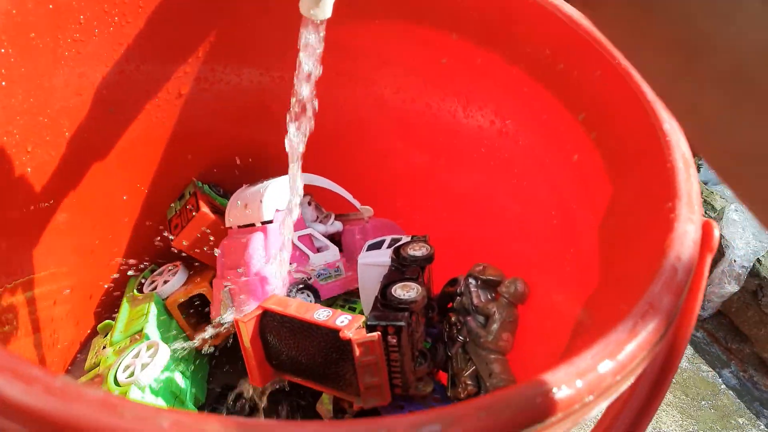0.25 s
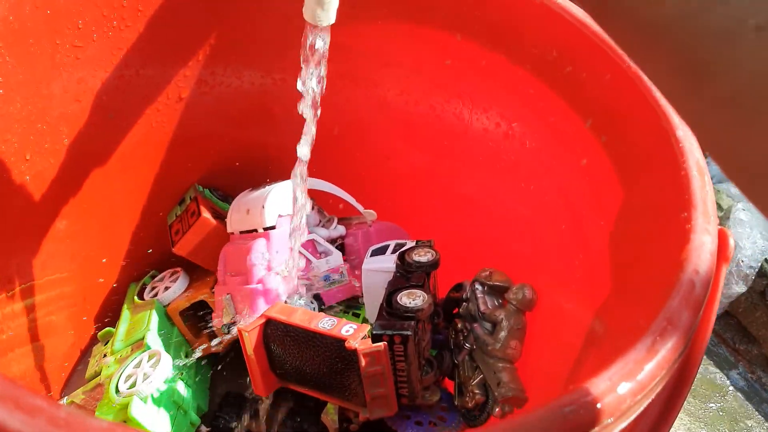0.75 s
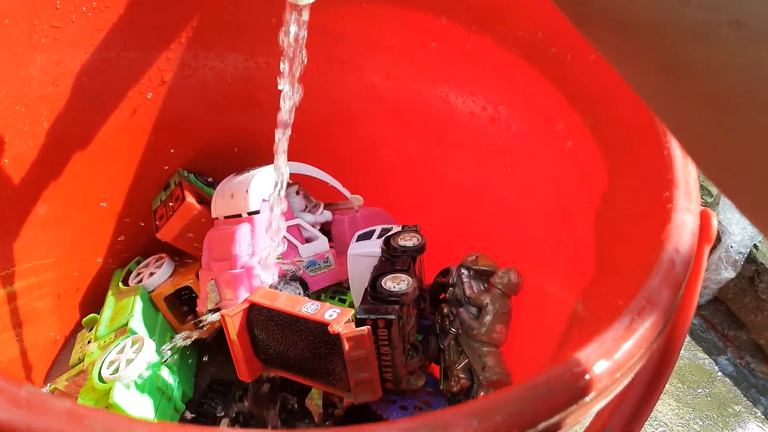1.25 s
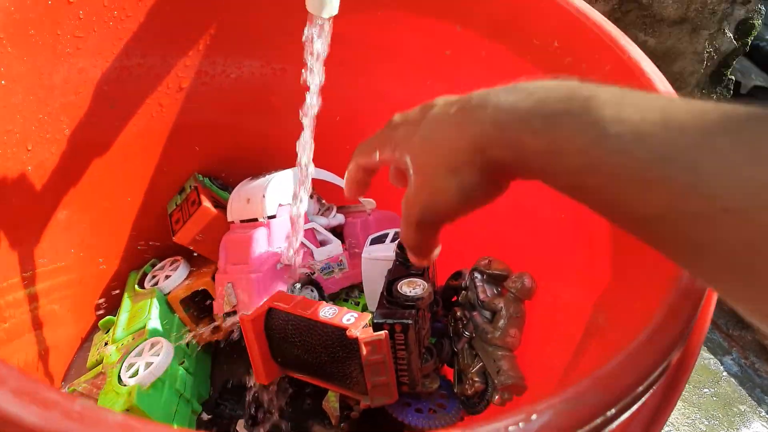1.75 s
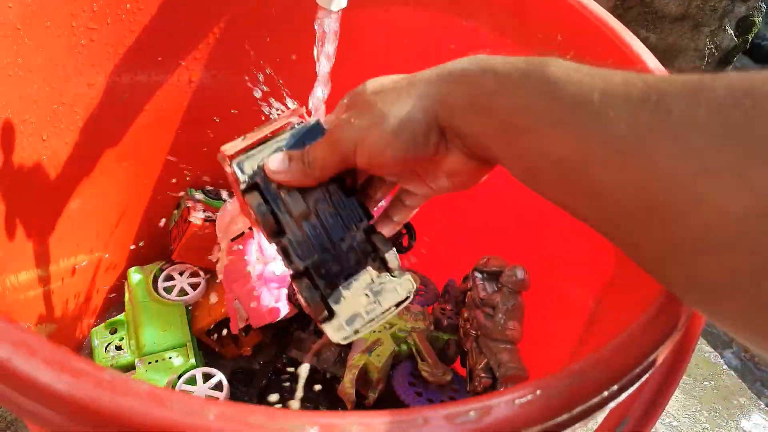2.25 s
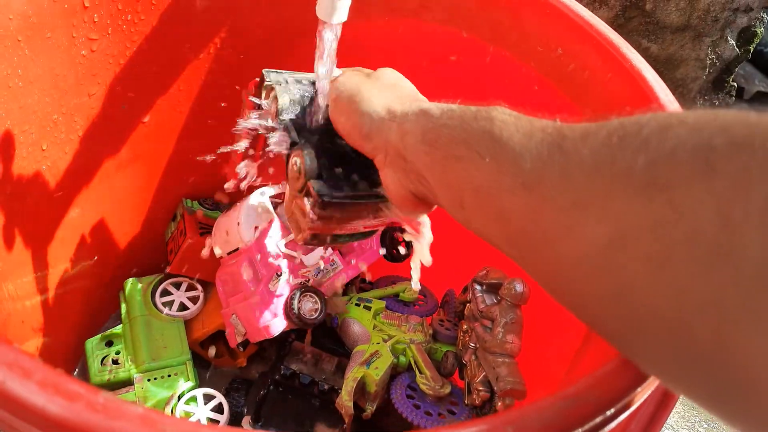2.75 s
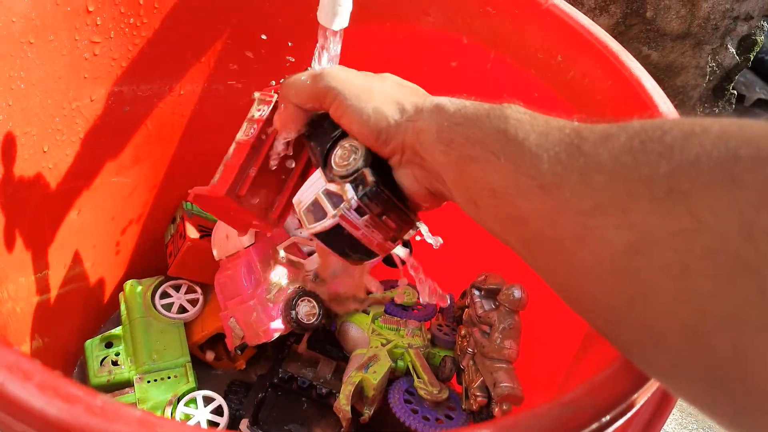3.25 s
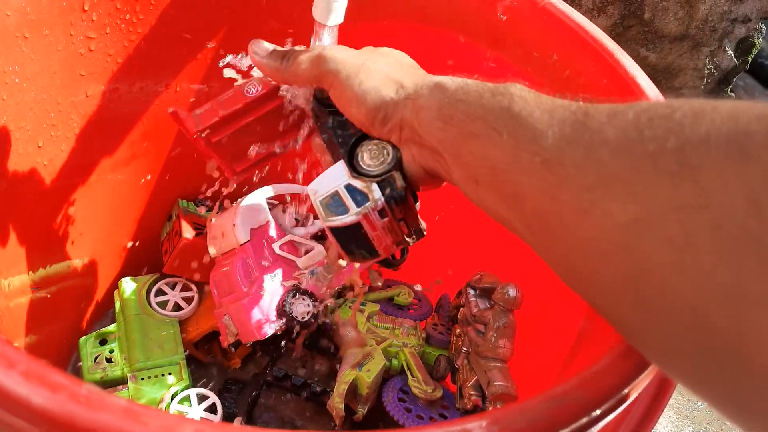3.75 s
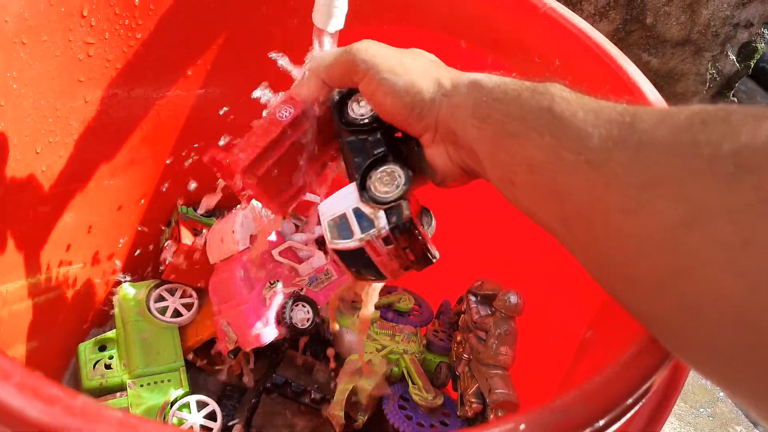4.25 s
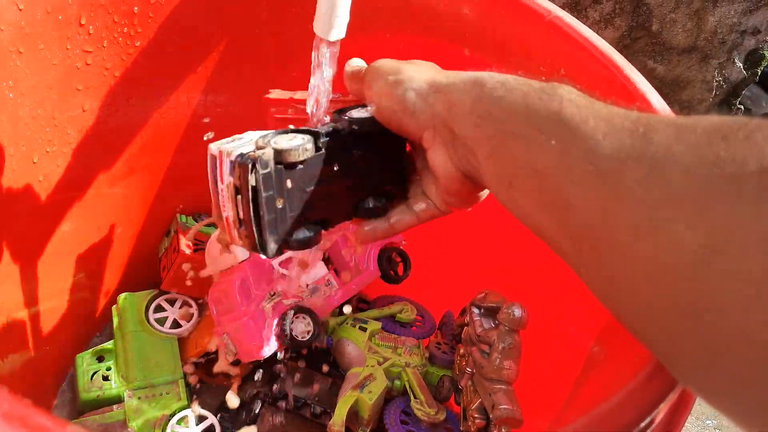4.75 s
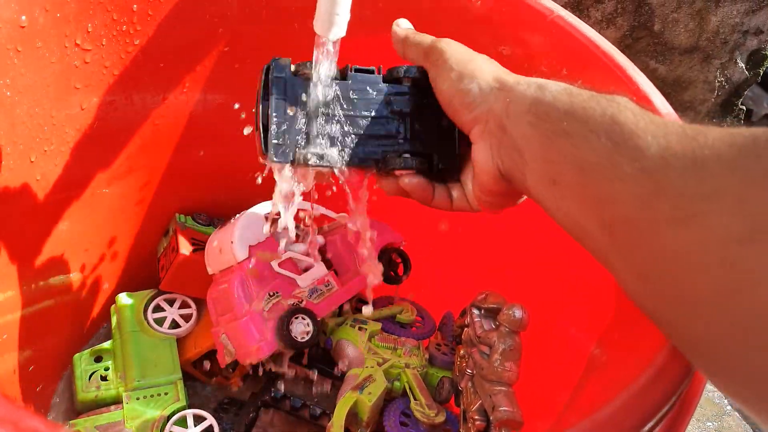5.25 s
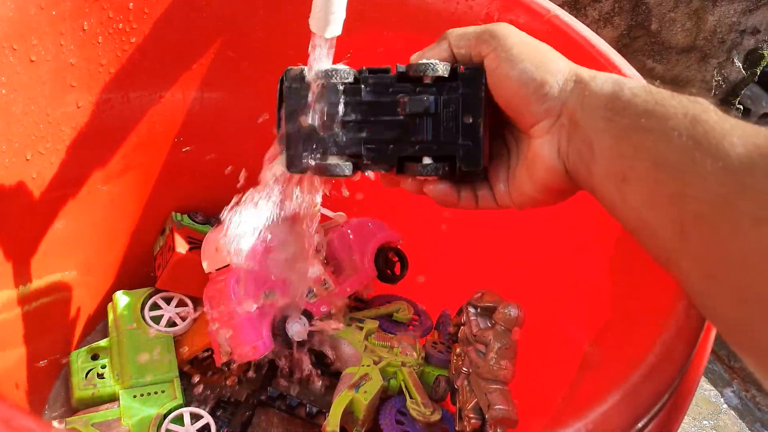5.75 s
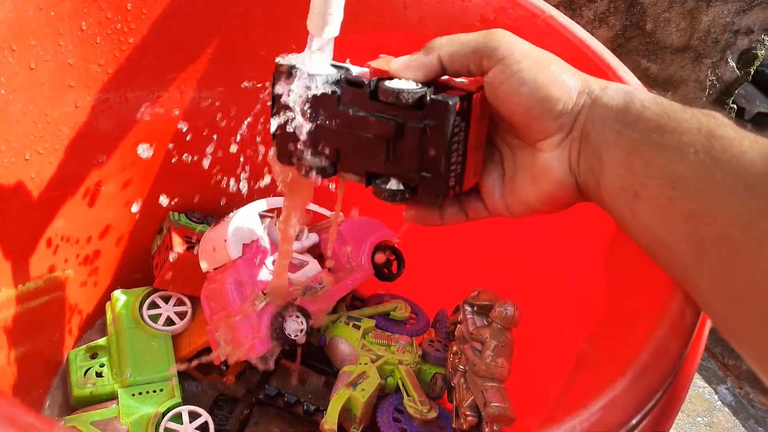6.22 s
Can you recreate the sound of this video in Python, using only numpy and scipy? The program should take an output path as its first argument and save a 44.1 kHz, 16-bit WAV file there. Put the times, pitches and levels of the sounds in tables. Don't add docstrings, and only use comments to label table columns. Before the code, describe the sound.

Outdoors, heard from close above a plastic bucket, a thin tap stream splatters over a heap of hard plastic toys with crisp spray, splats and small bubbles. At about two seconds a hand pulls one out and the heap tumbles with hollow knocks. The water then falls on the held toy, a little smoother, with light taps and one sharp knock near five seconds. A distant bird whistles faintly.

```python
import sys
import numpy as np
from scipy import signal
from scipy.fft import rfft, irfft
from scipy.io import wavfile
from scipy.ndimage import uniform_filter1d

SR = 44100
rng = np.random.default_rng(int(sys.argv[2]) if len(sys.argv) > 2 else 0)


def voltage_ratio(decibels):
    exponent = np.asarray(decibels, float) / 20
    return 10 ** exponent


def waveform_to_disk(signal):
    frames = np.transpose(np.atleast_2d(signal))
    scaled = np.clip(frames, -1, 1) * 32767
    samples = np.round(scaled).astype(np.int16)
    wavfile.write(sys.argv[1], SR, samples)


N = 285768
LIFT_S = 2.5

# t/s, flow level/dB, fineness of its break-up/dB
STREAM = [(0.0, -41.5, 4.5), (0.31, -45, -1), (0.68, -45.5, 3.5), (1.41, -53, 3), (1.68, -51.5, 3),
          (1.8, -49.5, 1.5), (2.26, -45.5, 1.5), (2.42, -46.5, 0.5), (3.12, -46.5, 1.5), (3.23, -46, 1),
          (3.95, -47, 2), (4.58, -45.5, 0), (4.78, -44, 2.5), (4.96, -43, 3), (5.07, -45, 1.5),
          (5.41, -48, 2.5), (5.88, -45.5, 4), (6.48, -49.5, 2)]
# f/Hz, level/dB per Hz
SPRAY_COLOUR = [(880, -22.5), (1500, -8), (1640, -10.5), (2170, -4), (2710, -5.5), (3350, -1.5), (6170, -3),
                (7620, 0.5), (8340, -2.5), (9500, -11.5), (12200, -3), (15100, -6), (16000, -7),
                (16900, -13.5)]
# t/s, peak level/dB, centre f/Hz, mist level/dB
HEAP_SPLATS = [(0.0034, -14.5, 7300, -4), (0.1202, -19.5, 7500, -27), (0.1479, -12.5, 7550, -13),
               (0.178, -17.5, 3800, -14), (0.1894, -20, 5270, 2), (0.248, -17, 5900, -9),
               (0.3002, -12, 7590, 3), (0.3258, -18, 2800, -31), (0.438, -21, 6800, -10),
               (0.597, -18, 5500, -12.5), (0.6403, -14, 6500, -9), (0.708, -12, 6150, -13),
               (0.729, -17, 7300, -2), (0.745, -18.5, 6400, -15), (0.838, -20, 2800, -21),
               (0.858, -14.5, 3150, -12), (0.9, -18.5, 7500, -9), (0.9823, -11, 6260, -11.5),
               (1.0695, -20, 7490, 3), (1.14, -21, 7480, 9), (1.1643, -30, 6850, -43),
               (1.2033, -17.5, 2360, 5), (1.3373, -20.5, 2620, -9), (1.408, -21.5, 6600, -8),
               (1.486, -20, 5500, -21), (1.6135, -17.5, 7400, 1), (1.701, -33, 7830, -18),
               (1.786, -21, 7440, 1), (1.859, -18, 8040, -16), (1.8767, -17, 5630, -15)]
# t/s, peak level/dB, centre f/Hz, mist level/dB
HELD_SPLATS = [(2.147, -19.5, 2560, -9), (2.1837, -21, 4930, -22), (2.2113, -12, 4060, -19),
               (2.269, -22.5, 5500, -29), (2.366, -18.5, 3940, -15), (2.4006, -23, 7140, -16),
               (2.683, -20.5, 8100, -8), (2.891, -30, 3650, -30), (3.077, -21, 7640, -13),
               (3.209, -22.5, 3460, -40), (3.2858, -23.5, 4170, -30), (3.424, -21, 7770, -46),
               (3.493, -25.5, 4230, -57), (3.696, -21.5, 7110, -6), (3.949, -12.5, 5260, -9),
               (3.9622, -19, 4300, -31), (4.1078, -26.5, 4500, -29), (4.315, -23, 6900, -14),
               (4.358, -23, 8000, -25), (4.551, -24, 7200, -11), (4.632, -22.5, 4100, -31),
               (4.934, -20, 7690, 2), (5.126, -10, 7560, -9), (5.158, -20.5, 5340, -32),
               (5.187, -21, 4340, -11), (5.454, -27, 7400, -8), (5.649, -21.5, 6400, -32),
               (5.703, -17, 7220, 3), (5.748, -14, 3630, -19), (5.941, -20, 2120, -4)]
# t/s, peak level/dB, centre f/Hz
DRIPS = [(0.4592, -22, 6660), (0.476, -26, 6490), (0.547, -18.5, 2740), (1.3653, -23.5, 3470),
         (1.653, -24, 4000), (1.827, -28, 2990), (1.916, -23, 7340), (2.328, -24.5, 6140),
         (4.579, -27, 3520), (4.649, -27, 4500), (4.658, -26, 3200), (5.985, -29, 2770), (6.086, -24, 4400),
         (6.356, -24, 3300), (6.456, -24.5, 2770)]
# f/Hz, width/Hz, level/dB
WALL_MODES = [(125, 28, -8.5), (193, 280, -7), (235.4, 11, 1), (338, 62, 0), (391, 37, -3.5)]
# f/Hz, width/Hz, level/dB
SHELL_MODES = [(600, 31.6, -5), (728, 230, -12.5), (835, 49, -11), (1060, 103, -9), (1240, 62, -11.5),
               (1430, 190, -10.5), (1530, 34, -10)]


def evened(x):
    return x / np.sqrt(np.mean(x ** 2) + 1e-20)


def peaked(x):
    return x / abs(x).max(axis=-1, keepdims=True)


def steadied(x):
    local_power = abs(uniform_filter1d(x ** 2, size=48))
    return x * np.sqrt(np.mean(x ** 2) / (local_power + 1e-20))


def read(points, hz):
    f, value = np.transpose(points)
    return np.interp(np.log(hz + 1), np.log(f + 1), value)


def follow(rows, t):
    s, *columns = np.transpose(rows)
    return [np.interp(t, s, c) for c in columns]


def bump(hz, centre_hz, octaves):
    return np.exp(-.5 * (np.log2((hz + 1) / centre_hz) / octaves) ** 2)


def colour(x, gain):
    hz = np.fft.rfftfreq(x.shape[-1], 1 / SR)
    return irfft(rfft(x) * gain(hz), x.shape[-1])


def dull(x, hz):
    return signal.sosfilt(signal.butter(4, hz, fs=SR, output="sos"), x)


def add(mix, s, sound):
    part = mix[:, max(round(s * SR), 0):][:, :sound.shape[1]]
    part += sound[:, :part.shape[1]]


def swell(t, rise, t60):
    shape = (1 - np.exp(-(t / rise) ** 2)) * voltage_ratio(-60 * t / t60)
    return shape / shape.max()


def ring(x, modes):
    total = 0
    for hz, width, db in modes:
        radius, angle = np.exp(-np.pi * width / SR), 2 * np.pi * hz / SR
        poles = [1, -2 * radius * np.cos(angle), radius * radius]
        total = total + voltage_ratio(db) * (1 - radius) * signal.lfilter([1, 0, -1], poles, x)
    return total


def struck(blow, modes):
    return peaked(sum(voltage_ratio(db) * peaked(ring(blow, [(hz, width, 0)])) for hz, width, db in modes))


def patter(size, per_s, spread_db, rise, t60, rate):
    landed = rng.random(size) < per_s / rate
    drops = landed * voltage_ratio(2 * spread_db * np.minimum(rng.exponential(1, size), 3))
    burst = swell(np.arange(round(0.18 * rate)) / rate, rise, t60)
    power = signal.oaconvolve(drops, burst[:, None] ** 2, axes=0)
    return abs(power[:size[0]]) / power.mean(0)


def spray():
    frames, hz, rate = N // 32 + 5, np.fft.rfftfreq(128, 1 / SR), SR / 32
    t = np.arange(frames) / rate
    held = t > LIFT_S
    flow_db, fine_db = follow(STREAM, t)
    mist_db = 0.91 * fine_db - 3 * held
    slosh_db = -0.54 * fine_db - 0.42 * flow_db

    bands = bump(hz, np.geomspace(2000, 14000, num=12)[:, None], 0.15)
    bands /= bands.sum(0) + 1e-9
    quick = patter((frames, 12), 90, 5.3, 0.0014, 0.012, rate) @ bands
    sheets = patter((frames, 12), 45, 6.8, 0.025, 0.083, rate) @ bands
    wide = patter((frames, 1), 82, 6.0, 0.0015, 0.064, rate)
    wide = wide * np.where(held, 0.2, 1)[:, None]
    power = 0.02 + 0.39 * quick + 0.69 * sheets + 0.72 * wide + 0.023 * held[:, None]

    mist = np.clip((hz - 8500) / 1500, 0, 1)
    slosh = np.clip((4600 - hz) / 1200, 0, 1)
    tilt_db = np.outer(mist_db - mist_db.mean(), mist) + np.outer(slosh_db - slosh_db.mean(), slosh)
    tilt_db += np.outer(gush(t), 1 - 0.48 * mist)
    a, b = rng.standard_normal((frames, 65, 2, 2)).T
    spectra = (a + 1j * b) * (np.sqrt(power) * voltage_ratio(tilt_db)).T
    hiss = signal.istft(spectra, nperseg=128, noverlap=96)[1][:, :N]
    hiss = evened(colour(hiss, lambda f: voltage_ratio(read(SPRAY_COLOUR, f))))
    return hiss * voltage_ratio(follow(STREAM, np.arange(N) / SR)[0] + 8.5)


def gush(t):
    s = np.array([row[0] for row in [*HEAP_SPLATS, *HELD_SPLATS, *DRIPS]])
    gush_db, gush_s = 2.5, 0.022
    return gush_db * np.tanh(np.exp(-((t[:, None] - s) / gush_s) ** 2).sum(1))


def splats():
    t, hz, out = np.arange(4096) / SR, np.fft.rfftfreq(4096, 1 / SR), np.zeros((2, N))
    body = swell(t, .0028, .014) + .1 * swell(t, .006, .06)
    snap = swell(t, .0022, .008) + .08 * swell(t, .004, .04)
    drip_mist_db = -18.5
    slugs = [*HEAP_SPLATS, *HELD_SPLATS, *[(*row, drip_mist_db) for row in DRIPS]]
    for s, db, centre_hz, mist_db in slugs:
        drops = rfft(rng.standard_normal((2, 4096))) * voltage_ratio(read(SPRAY_COLOUR, hz))
        low = irfft(drops * (hz < 9300) * (0.36 + bump(hz, centre_hz, 0.21)))
        high = irfft(drops * (hz >= 9300) * voltage_ratio(mist_db + 9.0))
        add(out, s - .0014, voltage_ratio(db + 0.5) * peaked(steadied(low) * body + high * snap))
    return out


def ticks():
    # t/s, peak level/dB, centre f/Hz
    small_drops = [(0.0717, -28, 7490), (0.0946, -26, 7730), (0.215, -27, 7600), (0.3219, -20.5, 2630),
                   (0.352, -26, 3630), (0.3664, -41, 8050), (0.377, -27, 6410), (0.4034, -30, 7650),
                   (0.4299, -26, 5250), (0.646, -22, 7640), (0.655, -23, 6580), (0.696, -27, 7060),
                   (0.717, -19, 5800), (0.737, -23, 6560), (0.763, -29, 7430), (0.7734, -35, 6490),
                   (0.829, -24, 7420), (0.8668, -24.5, 2800), (0.882, -21.5, 7500), (0.9174, -30, 2420),
                   (0.9693, -28, 7010), (1.008, -28, 7510), (1.022, -28, 4950), (1.038, -21.5, 7040),
                   (1.056, -26, 6980), (1.094, -25.5, 7470), (1.107, -29, 7040), (1.164, -26, 7260),
                   (1.2368, -32.5, 5500), (1.308, -29, 3290), (1.355, -25, 3400), (1.4572, -25, 2950),
                   (1.6, -36, 7340), (1.6323, -23, 2350), (1.703, -21.5, 7900), (1.7224, -25, 7100),
                   (1.7364, -23, 7300), (1.7494, -24, 8000), (1.792, -20, 7300), (1.802, -22.5, 2920),
                   (1.8363, -21, 2950), (1.904, -25, 7290), (1.9524, -35, 5600), (2.006, -32, 2820),
                   (2.0557, -20, 2780), (2.174, -21.5, 6150),
                   (2.4414, -31, 7680), (2.577, -28.5, 4090), (2.612, -27, 7540), (2.6583, -34, 7950),
                  (2.7778, -26.5, 4420), (2.818, -26.5, 3730), (2.8612, -26, 4240), (2.872, -25, 3690),
                  (2.94, -32, 3730), (2.995, -25, 3780), (3.0145, -29, 2230), (3.037, -27.5, 5410),
                  (3.1228, -26, 6780), (3.1617, -29, 4400), (3.24, -34, 7110), (3.3233, -25.5, 7900),
                  (3.5409, -29, 7130), (3.761, -24, 6530), (3.92, -32, 2000), (3.978, -27.5, 3560),
                  (4.026, -30, 7350), (4.065, -28, 3660), (4.14, -29, 6970), (4.173, -31, 7010),
                  (4.274, -23.5, 7900), (4.341, -25, 7880), (4.447, -30, 7460), (4.527, -25.5, 7600),
                  (4.565, -23, 3840), (4.6957, -23.5, 6750), (4.737, -24.5, 4050), (4.7673, -21.5, 3900),
                  (4.992, -29, 5190), (5.033, -26.5, 7120), (5.0973, -35, 7180), (5.167, -18.5, 7400),
                  (5.252, -24.5, 5350), (5.3257, -25, 3750), (5.4196, -30, 4700), (5.5447, -28.5, 5200),
                  (5.63, -27, 6330), (5.7857, -22.5, 7700), (5.454, -28, 3900), (5.9748, -32, 2480),
                  (6.018, -26, 2540), (6.0353, -24, 5700), (6.047, -26.5, 7110), (6.1423, -30, 3270),
                  (6.152, -31, 5100), (6.229, -24, 3970), (6.2483, -24, 7810), (6.301, -24.5, 3720),
                  (6.412, -28.5, 2750)]
    t, hz, out = np.arange(1024) / SR, np.fft.rfftfreq(1024, 1 / SR), np.zeros((2, N))
    puff = swell(t, .0013, .018)
    for s, db, centre_hz in small_drops:
        gain = voltage_ratio(read(SPRAY_COLOUR, hz)) * (0.36 + bump(hz, centre_hz, 0.23))
        drop = irfft(rfft(rng.standard_normal((2, 1024))) * gain)
        add(out, s - .001, voltage_ratio(db + 1) * peaked(steadied(drop) * puff))
    return out


def fizz():
    t, out = np.arange(900) / SR, np.zeros((2, N))
    for hz in np.geomspace(1400, 8000, num=24):
        born = rng.random(N) < hz / 300 / SR
        size = born * voltage_ratio(2.9 * np.minimum(rng.exponential(1, N), 3))
        cycles = hz * t
        phase = cycles * (1 + 0.00133 * cycles) + rng.random((2, 1))
        tone = np.sin(2 * np.pi * phase) * swell(cycles, 2.0, 110)
        out += signal.oaconvolve(size[None], tone, axes=1)[:, :N]
    return evened(out) * voltage_ratio(follow(STREAM, np.arange(N) / SR)[0] - 7.0)


def plinks():
    # t/s, peak level/dB, f/Hz
    bubbles = [(0.432, -35.5, 1520), (0.571, -32.5, 2210), (1.75, -46, 3140), (0.86, -34, 2640),
               (1.1974, -36, 2330), (1.2627, -39, 1530), (1.31, -38, 1524), (1.428, -42, 1530),
               (1.5619, -35.5, 1570), (1.672, -35, 2700), (3.209, -31.5, 3240), (3.406, -34, 2010),
               (3.876, -38, 2270), (2.87, -36, 3670), (2.893, -40, 3660), (3.915, -28.5, 1937),
               (4.4682, -38.5, 2135), (4.5757, -35, 2150), (4.5993, -41, 2110), (5.941, -44, 3270),
               (5.978, -35, 1900), (6.047, -45, 2190), (5.955, -44, 2160), (5.9509, -30.5, 1880),
               (5.9844, -32.5, 2530), (6.017, -37, 2490), (6.0364, -39, 2040)]
    t, out = np.arange(3000) / SR, np.zeros((2, N))
    for s, db, hz in bubbles:
        tone = np.sin(2 * np.pi * (hz * t * (1 + 0.78 * t) + rng.random((2, 1))))
        froth = evened(ring(rng.standard_normal((2, 3000)), [(hz, 500, 0)]))
        add(out, s - .001, voltage_ratio(db) * (tone + 0.54 * froth) * swell(t, 0.0033, 0.062))
    return out


def drumming():
    shells_gain, wall_gain = shaking()
    steps, rate = N // 32 + 1, SR / 32
    shared = patter((steps, 1), 60, 1.8, 0.00031, 0.067, rate)
    own = patter((steps, len(SHELL_MODES)), 45, 6.7, 0.0022, 0.059, rate)
    jolts = np.repeat(0.53 + .5 * shared + 0.84 * own, 32, axis=0)[:N].T
    shells = np.zeros((2, N))
    for jolt, mode in zip(jolts, SHELL_MODES):
        shells += ring(np.sqrt(jolt) * rng.standard_normal((2, N)), [mode])
    wall = ring(np.sqrt(2.0 + jolts.mean(0)) * rng.standard_normal((2, N)), WALL_MODES)
    shells = voltage_ratio(-4.0) * shells_gain * evened(dull(shells, 1440))
    return shells + voltage_ratio(-1.16) * wall_gain * evened(dull(wall, 580))


def shaking():
    # t/s, level/dB
    drum = [(0.0, -46), (.55, -45.5), (1.0, -49), (1.3, -51.5), (1.9, -52.5), (2.42, -51), (2.47, -60.5),
            (2.6, -51), (3.1, -54), (3.5, -49), (4.15, -51), (4.9, -47.5), (5.3, -52.5), (6.48, -47.5)]
    # middle t/s, length/s, level/dB, wall over shells/dB
    shoves = [(0.165, 0.11, -48, -5), (2.023, 0.16, -42, -4), (2.147, 0.24, -36, -3.5),
              (2.255, 0.08, -43, -3), (2.376, 0.13, -50.5, 2.5), (2.627, 0.046, -40.5, -6),
              (2.834, 0.072, -41.5, -9), (3.03, 0.21, -46, -11.5), (3.35, 0.25, -45.5, -38),
              (3.572, 0.04, -41, -13.5), (3.947, 0.2, -45.5, -23), (4.348, 0.14, -44.5, -14),
              (3.7, 0.21, -61.5, 3), (4.503, 0.12, -63, 7), (4.734, 0.25, -55, 2.5),
              (5.114, 0.2, -40, -8.5), (5.197, 0.1, -52, -3), (5.563, 0.093, -45.5, -10.5),
              (5.958, 0.29, -63, 3)]
    t = np.arange(N // 32 + 1) * 32 / SR
    shells = voltage_ratio(2 * follow(drum, t)[0])
    wall = shells * voltage_ratio(2 * (-8 - 8.5 * (t > LIFT_S)))
    for s, length, db, wall_db in shoves:
        push = voltage_ratio(2 * db) * np.exp(-(3 * (t - s) / length) ** 2)
        shells, wall = shells + push, wall + voltage_ratio(2 * wall_db) * push
    return np.repeat(np.sqrt([shells, wall]), 32, axis=1)[:, :N]


def knocks():
    # t/s, peak level/dB, shell
    # f/Hz, wall/dB, crack/dB
    toy_knocks = [(0.171, -23.5, 617, -15, -5.5), (0.479, -25.5, 920, -20, -29), (0.546, -25.5, 1080, -12, -13),
                  (3.55, -34, 815, -24, 0), (3.894, -33, 650, -19, -8), (3.96, -29.5, 710, -25, 3),
                  (4.101, -29.5, 840, -12, -13), (4.365, -29, 1050, -31, -15), (5.036, -24.5, 1020, -29, -14),
                  (5.094, -30.5, 587, -11, -30), (5.128, -4.5, 1174, -17, -8), (5.402, -29.5, 885, -23, -24),
                  (2.052, -25, 800, -4, -10), (5.545, -26, 1240, -25, -5),
                  (2.019, -24, 1590, -6, 1), (2.067, -16.5, 1430, -6, -10), (2.106, -18, 905, -7, -6),
              (2.119, -15, 1030, -11.5, -8.5), (2.125, -15, 1410, -12, -9.5), (2.214, -16, 885, -3, -2.5),
              (2.27, -25, 630, -1, -21), (2.608, -25, 500, -13, -21), (2.635, -28.5, 1060, -30, -16),
              (2.715, -18.5, 1005, -15, -5.5), (2.802, -22.5, 820, -9, -8.5), (2.921, -17.5, 620, -13, -6),
              (2.956, -28, 606, -7, -17), (3.027, -31, 1480, -16, -3)]
    # f/Hz, width/Hz, level/dB
    crack_modes = [(2314, 166, 9.5), (2700, 1200, 18), (3400, 83, -2)]
    t, out = np.arange(6000) / SR, np.zeros((2, N))
    rattle = swell(t, 0.0014, 0.018) + 0.05 * swell(t, 0.005, 0.09)
    wall_modes = [*WALL_MODES, (152, 1000, 13)]
    for s, db, hz, wall_db, crack_db in toy_knocks:
        blow = rng.standard_normal((2, 6000)) * rattle
        own = [(hz, 85, 3), (1.34 * hz, 600, -3), (1.654 * hz, 150, -4)]
        near = [(f, w, d - 6.5 * abs(np.log2(f / hz))) for f, w, d in SHELL_MODES]
        shell = dull(struck(blow, own + near), 2790)
        wall = dull(struck(blow, wall_modes), 790)
        crack = dull(struck(blow, crack_modes), 10000)
        add(out, s - .0017, voltage_ratio(db) * (shell + voltage_ratio(wall_db) * wall + voltage_ratio(crack_db + 4.5) * crack))
    return out


def taps():
    # t/s, peak level/dB, shell f/Hz
    touches = [(0.057, -35, 1490), (0.119, -36, 1340), (0.153, -29, 600), (0.365, -34, 1500),
               (0.85, -26.5, 1530), (0.915, -33, 955), (1.003, -37.5, 1350), (1.694, -36, 1480),
               (1.953, -34, 1400), (1.971, -33, 571), (2.058, -23, 1420), (2.133, -23, 590),
               (2.148, -31, 580), (2.184, -31, 1370), (2.323, -39, 600), (2.776, -34, 790),
               (2.828, -35.5, 754), (2.851, -32.5, 1520), (2.899, -42, 603), (2.938, -33, 600),
               (2.987, -34, 657), (3.004, -34, 1030), (3.034, -30.5, 1040), (3.232, -41, 1010),
               (3.284, -34, 700), (3.366, -41, 580), (3.533, -39, 1290), (4.658, -40, 1070),
               (4.939, -33, 1025), (4.96, -38, 584), (5.183, -32, 589), (5.453, -33, 1520),
               (5.649, -38.5, 705), (5.909, -39.5, 630), (5.976, -40, 1430), (6.036, -36.5, 1240)]
    t, out = np.arange(3000) / SR, np.zeros((2, N))
    for s, db, hz in touches:
        blow = rng.standard_normal((2, 3000)) * swell(t, 0.00097, 0.024)
        modes = [(hz, 50, 0), (1.86 * hz, 300, -9), (236, 60, -12)]
        add(out, s - .0015, voltage_ratio(db - 1) * struck(blow, modes))
    return out


def thuds():
    # t/s, peak level/dB
    bumps = [(2.0223, -36), (2.051, -32), (2.133, -29.5), (2.186, -33.5), (2.6131, -32), (2.812, -43.5),
             (5.4733, -35.5)]
    # f/Hz, level/dB, t60/s
    bucket_modes = [(116.4, -5, 0.1), (236, 4, 0.05), (347, -4.5, 0.096)]
    t, out = np.arange(6000) / SR, np.zeros((2, N))
    body = sum(voltage_ratio(db) * swell(t, 0.0013, t60) * np.sin(2 * np.pi * hz * t) for hz, db, t60 in bucket_modes)
    for s, db in bumps:
        add(out, s, voltage_ratio(db) * peaked(np.array([body, body])))
    return out


def bird():
    # t/s, level/dB
    whistles = [(1.271, -43.5), (2.339, -40), (3.584, -39), (6.23, -40)]
    out, late = np.zeros((2, N)), np.arange(9000) / SR
    for s, db in whistles:
        hz = np.geomspace(4250, 2200, round(.068 * SR))
        size = len(hz)
        hz = hz + 90 * evened(uniform_filter1d(rng.standard_normal(size), size=120))
        tone = np.sin(2 * np.pi * np.cumsum(hz) / SR)
        tone *= signal.windows.tukey(size, .4) * (hz / 2600) ** 1.5
        tone *= 1.1 + .35 * np.sin(2 * np.pi * 55 * np.arange(size) / SR)
        echoes = .016 * rng.standard_normal((2, len(late))) * swell(late, .012, .3)
        echoes[[0, 1], [0, 40]] = 1
        add(out, s, voltage_ratio(db) * signal.fftconvolve(tone[None], echoes, axes=1))
    return out


def yard():
    # f/Hz, level/dB per Hz
    rumble = [(18, -34), (30, 3), (70, 4), (117, -1.5), (178, -8), (384, -8), (450, -20), (580, -68),
              (990, -120)]
    noise = rng.standard_normal((2, N))
    return voltage_ratio(-61) * evened(colour(noise, lambda f: voltage_ratio(read(rumble, f))))


def scene():
    # f/Hz, likeness/0..1
    likeness = [(60, 0.78), (300, 0.92), (1000, 1), (2000, 0.19), (4000, 0.022), (16000, 0.43)]
    # f/Hz, phase/rad
    port_lead = [(0, 0), (400, -0.4), (690, -1.29), (1380, -1.1), (1640, -3), (2410, -1), (3880, -4),
                 (5170, -12.5), (5600, -14), (5860, -13), (8270, -32), (9560, -36.5), (14200, -71.5),
                 (15900, -70), (16600, -87)]
    # f/Hz, left over right/dB
    balance = [(60, 2), (120, 2.5), (240, 5), (480, 1.5), (950, -2.5), (1890, 0), (3770, 0.5), (7520, 4),
               (15000, 4)]
    water = spray() + splats() + ticks() + fizz() + plinks()
    plastic = drumming() + knocks() + taps() + thuds()
    first, other = water + plastic + bird() + yard()

    f, lead = np.transpose(port_lead)
    hz = np.fft.rfftfreq(N, 1 / SR)
    same, lean = np.clip(read(likeness, hz), 0, 1), voltage_ratio(read(balance, hz) / 2)
    left = lean * np.exp(1j * np.interp(hz, f, lead - lead[0])) * rfft(first)
    right = (same * rfft(first) + np.sqrt(1 - same ** 2) * rfft(other)) / lean
    drift_db = np.interp(np.arange(N) / SR, [0, 1.4, 2.7, 3.6, 4.2, 6.5], [0.0, -0.5, -2.5, -2.0, -2.0, -1.5])
    return irfft(np.array([left, right]), N) * voltage_ratio([drift_db / 2, -drift_db / 2])


def band_limit(x):
    return signal.sosfilt(signal.butter(12, 15950, fs=SR, output="sos"), x)


def record(dry):
    bass_cut = signal.butter(4, 44, "highpass", fs=SR, output="sos")
    top_cut = signal.firwin(301, 16600, window=("kaiser", 9), fs=SR)
    mix = signal.oaconvolve(signal.sosfilt(bass_cut, dry), top_cut[None], "same")
    return band_limit(mix)


dry = scene()
out = record(dry)
waveform_to_disk(out)
```